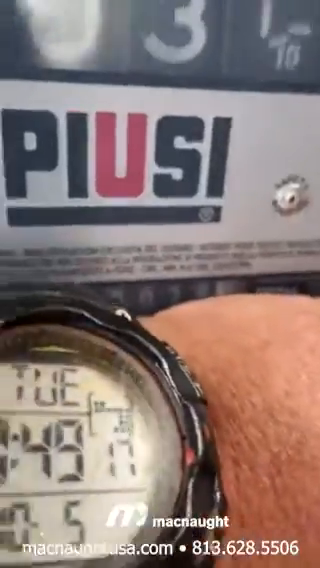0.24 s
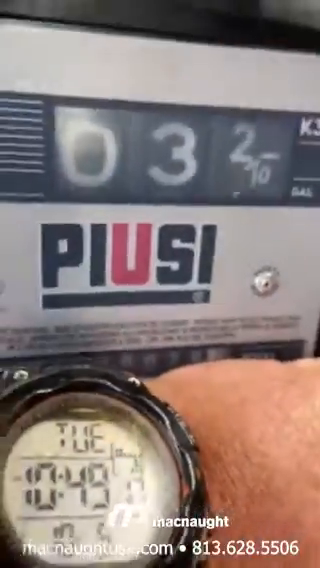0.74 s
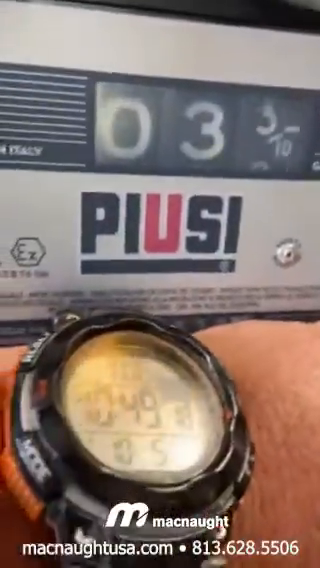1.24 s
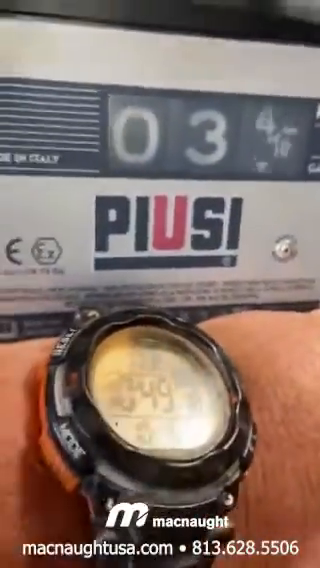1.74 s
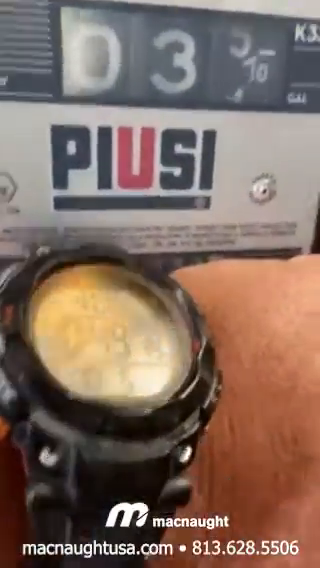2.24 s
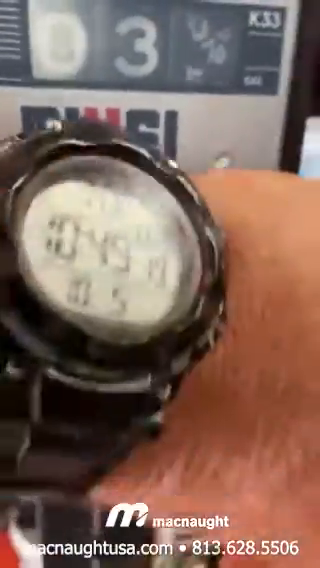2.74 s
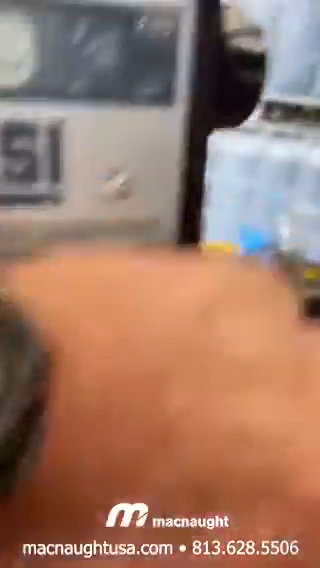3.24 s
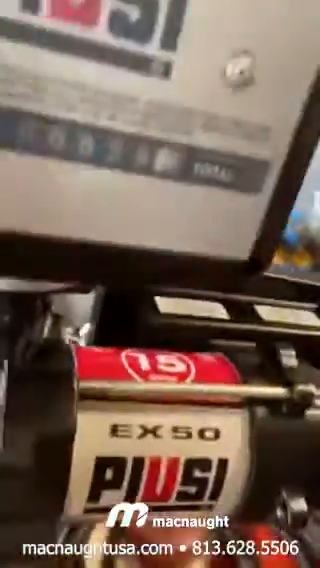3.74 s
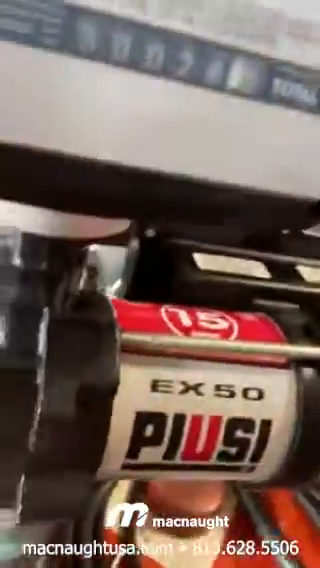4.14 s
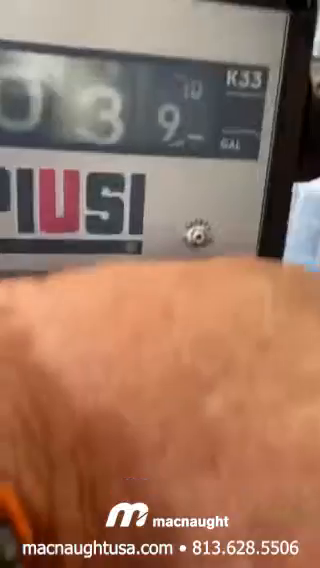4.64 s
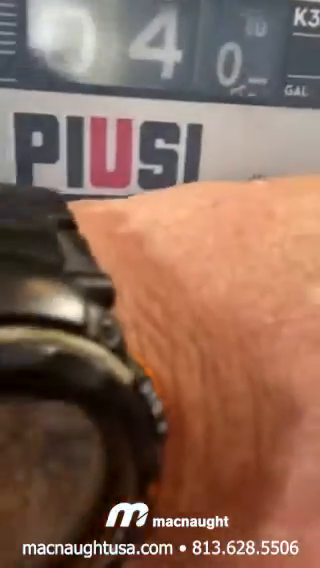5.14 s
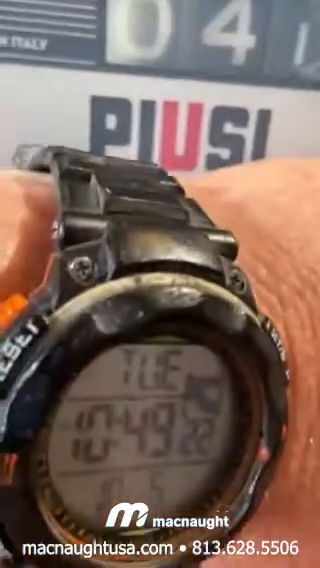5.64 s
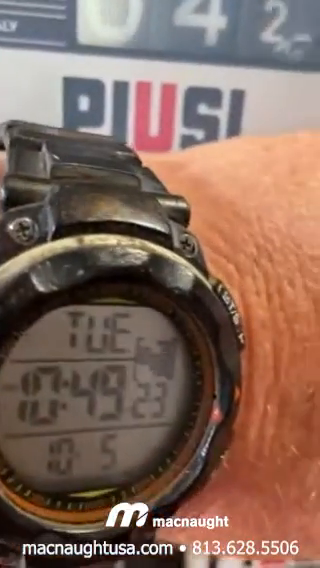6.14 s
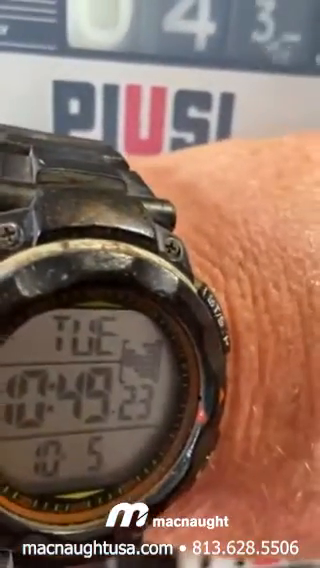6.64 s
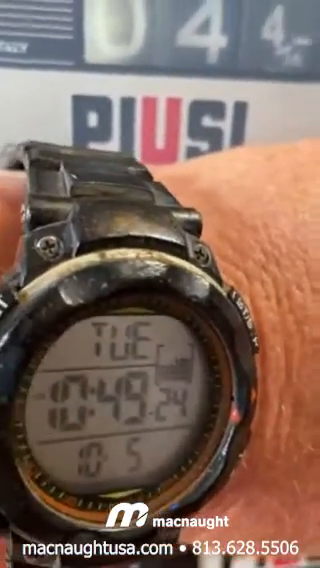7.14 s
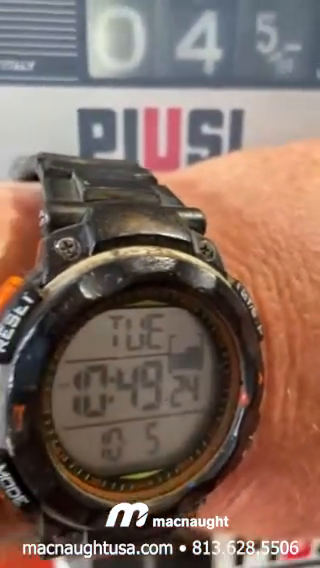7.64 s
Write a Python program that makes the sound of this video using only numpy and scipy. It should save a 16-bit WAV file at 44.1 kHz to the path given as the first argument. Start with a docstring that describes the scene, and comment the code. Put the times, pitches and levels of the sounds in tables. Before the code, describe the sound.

Steady droning buzz of a small vane pump moving fuel, slightly changing in pitch and tone, rattling and shuddering briefly midway, heard close in stereo.

```python
"""Vane pump under varying load

An electric five-vane fuel pump runs while a hand-held phone moves around its meter. Every vane
pushes out a pressure pulse: a harmonic buzz that speeds up and changes colour when the load lets up.
Under strain the casing sings. Unequal vanes rattle it once a turn, and an off-centre rotor shudders.
Fuel turbulence rushes and hisses, the meter's face echoes the treble, and two machines drone nearby."""
import sys
import numpy as np
from scipy import signal
from scipy.fft import rfft, irfft, next_fast_len
from scipy.io import wavfile
from scipy.ndimage import uniform_filter1d, map_coordinates

SR = 44100
rng = np.random.default_rng(int(sys.argv[2]) if len(sys.argv) > 2 else 0)


def transcribe(signal):
    """Save signal, clipped to [-1, 1], as a 16-bit WAV file at the path in sys.argv[1]."""
    frames = np.atleast_2d(signal).T
    limited = np.clip(frames, -1, 1)
    pcm = np.round(limited * 32767).astype(np.int16)
    wavfile.write(sys.argv[1], SR, pcm)


N = 347508

# Strains, when the pump labours and its casing sings. Each row: start in seconds, length in seconds,
# depth, initial pitch of the singing in Hz, its full level in dB.
STRAINS = [(0.163, 0.47, 0.56, 3300, -49), (2.17, 0.34, 0.18, 3650, -38), (3.101, 0.28, 0.46, 3260, -40),
           (4.58, 0.171, 0.32, 2560, -48), (5.303, 0.22, 0.27, 3150, -45)]
# Shudders of the casing. Each row: start in seconds, length in seconds, strength.
SHUDDERS = [(3.42, 0.45, 0.22), (3.87, 0.43, .9), (4.32, 0.55, 0.45)]

VANES = 5
LOAD_ATTACK_S, LOAD_RELEASE_S = 0.101, 0.2
FADE_S = 0.057  # rise and fall of the brief changes of partials, and of shudders and throbs
UNLOADED_DEPTH = 0.59  # depth of easing beyond which the vanes lose their bite
SWING_ANGLE = 3.0  # angle of the turn, in radians, where the rotor is closest to the housing


def buzz(phase, ease, shares):
    """Harmonic series of a periodic source: the load shifts strength between partials of the vane pulses."""
    # Low hum, the second partial. Each row: time in seconds, level in dB.
    hum_table = [(0.0, -21), (0.22, -20.5), (0.5, -25.5), (2.04, -22.5), (2.57, -29.5), (2.61, -25),
                 (3.93, -24), (4.08, -21.5), (4.32, -25.5), (4.54, -21), (4.78, -28), (4.96, -22.5),
                 (5.64, -26), (6.43, -21.5), (7.81, -27.5), (7.88, -26)]
    # Other partials. Each row: multiple of the vane rate, level in dB at place 0, 1 and 2
    # (before a common trim), change in dB at an easing of depth 1.
    partials = [(1, -35.5, -34, -32.5, 0.5), (3, -44, -39.5, -42, -0.5), (4, -25.5, -27, -35.5, 1),
                (5, -38, -42.5, -38, 7.5), (6, -27.5, -28.5, -32.5, -2), (7, -27.5, -31.5, -24.5, 5.5),
                (8, -49, -39, -36.5, 1), (9, -33.5, -43.5, -45, -0.5), (10, -44, -37, -43, -1),
                (11, -29, -28.5, -39, -3), (12, -30, -36, -46, -2), (13, -35, -53, -44, -5),
                (14, -38.5, -40.5, -46, -2), (15, -40.5, -46, -48.5, 0.5), (16, -38, -44.5, -43.5, -2),
                (17, -45.5, -63, -58, -10), (18, -47, -40, -43, -3), (19, -47.5, -49, -40.5, -11),
                (20, -49, -47.5, -54, -12), (21, -51, -58, -55, -10), (22, -48.5, -57, -57, -1.5),
                (23, -69, -65, -47, 5), (24, -63, -58, -46, -2), (25, -54, -54, -66, -1),
                (27, -52, -50, -66, -0.5), (29, -64, -63, -64, 1), (32, -69, -68, -52, 1),
                (34, -68, -59, -65, -2)]
    # Single partials swell or sink for a while.
    # Each row: start in seconds, length in seconds, change in dB, multiple of the vane rate.
    single_changes = [(2.245, 0.5, 17, 3), (3.213, 1.67, 14.5, 3), (2.603, 0.26, -6.5, 4),
                      (3.55, 0.73, 3.5, 4), (5.1, 0.077, -9, 4), (5.88, 0.34, -6, 4), (7.3, 0.66, 5, 4),
                      (1.6, .6, 1, 5), (2.6, 0.21, -3, 5), (4.2, .63, -7, 5), (4.35, .15, 1.5, 5),
                      (4.92, 0.533, 2.5, 5), (5.99, .2, 4, 5), (6.278, 0.301, -12, 5), (6.8, 1.1, 5, 5),
                      (5.57, .13, -5, 6), (5.98, .15, 1, 6), (7.15, 0.69, 3.5, 6), (0.253, 0.26, -7, 7),
                      (2.299, 0.22, -7, 7), (3.141, 0.41, -5.5, 7), (3.797, 0.428, 3.5, 7),
                      (4.5, 0.21, 4, 7), (4.87, 0.33, 4.5, 7), (6.3, 1.55, 2, 7), (2.8, .3, 5, 8),
                      (4.35, 0.25, 5.5, 8), (6.4, 1.25, 2, 8), (5.989, 1.29, 10, 9), (4.55, 0.94, 3.5, 10),
                      (5.999, 1.13, 4.5, 10), (3.617, 0.222, 2, 11), (3.84, 0.16, -3, 11),
                      (3.8, 0.14, 3.5, 11), (4.55, 0.346, -0.5, 11), (0.347, 0.44, 3, 12),
                      (3.18, .28, 2.5, 12), (3.83, 0.34, -14, 12), (4.9, 0.67, 3.5, 12), (2.05, .5, -6, 13),
                      (5.17, 0.42, 8, 13), (4.97, 0.69, -17, 14), (3.52, 0.58, -6, 16),
                      (0.18, 0.497, 1.5, 20), (.2, .5, 0.5, 17), (1, .8, 0, 17), (7.1, .8, 5, 23),
                      (4.75, 0.62, 10.5, 25)]
    # Dips of the partials above the second. Each row: start in seconds, length in seconds, change in dB.
    muffles = [(5.517, 0.468, -2.5)]
    # Throb depth added by a shudder of strength 1. Each row: multiple of the vane rate, depth from 0 to 1.
    shudder_depths = [(3, .05), (4, .38), (6, .36), (7, .08), (9, .15), (10, .3), (11, .42), (14, .35),
                      (20, .3)]
    collapse = 6.7  # further loss without load, for partials that need it
    wander_db, upper_wander_db, flutter_db = 0.84, 1.5, 1.02
    phase_spread = 1.27  # radians, from each partial's own path through the casing
    port_spread = 0.02  # difference between the ports per multiple of the vane rate
    whine_db, limp_db = -0.12, -23

    hum_db, = curves(hum_table)
    muffle_db = swells(muffles, FADE_S, FADE_S)
    shaking = swells(SHUDDERS, FADE_S, FADE_S)
    unloaded = np.maximum(ease - UNLOADED_DEPTH, 0)
    rotor = np.exp(1j * (phase / VANES - SWING_ANGLE))

    def partial(order, db):
        """A partial as a rotating phasor, with a fluttering level and a phase of its own."""
        angle = order * phase + phase_spread * rng.standard_normal()
        return undb(db + flutter_db * walk(35)) * np.exp(1j * angle)

    whine, apart = 0, 0
    for order, *place_db, ease_db in partials:
        order = round(order)
        # short waves wander most as the phone moves
        wander = np.interp(order, (7, 13), (wander_db, upper_wander_db)) * walk(4)
        load_db = ease_db * ease + collapse * min(ease_db, 0) * unloaded
        own_changes = [row for row in single_changes if round(row[-1]) == order]
        change_db = swells(own_changes, FADE_S, FADE_S)
        total_db = np.array(place_db) @ shares + load_db + change_db + wander
        if order > 1:
            total_db = total_db + muffle_db
        # the off-centre rotor makes the partials surge together once a turn, deeply in a shudder
        limp = undb(limp_db) + shaking * np.interp(order, *np.transpose(shudder_depths))
        tone = partial(order, total_db) / (1 - limp * rotor)
        whine = whine + tone.real
        apart = apart + port_spread * order * walk(1.99) * tone.imag
    hum = partial(2, hum_db).real
    stereo_whine = whine + np.array([[1], [-1]]) * apart
    return np.sqrt(2) * (hum + undb(whine_db) * stereo_whine)


def rattle(phase, shares):
    """Impulse excitation of resonances: unequal vanes knock the casing in a pattern repeated each turn."""
    # Casing resonances. Each row: centre in Hz, width in Hz, relative level in dB at place 0, 1 and 2.
    casing_modes = [(407, 59, 11, 11, -1), (760, 190, 0.5, 6, -22), (1210, 93, 6, 5.5, 7.5),
                    (1477, 170, 4, -25, -6), (1715, 270, -33, -5.5, -1), (2720, 2300, -24, -27, -18),
                    (3730, 1350, -8.5, -30, -7)]
    rattle_db, second, scatter = -35.5, 0.56, 0.41

    stroke = phase / (2 * np.pi)
    number = np.arange(1, int(stroke[-1]))
    angle = 2 * np.pi * number / VANES
    chance = rng.standard_normal(len(number))
    size = np.cos(angle) + second * np.cos(2 * angle + 1) + scatter * chance
    # each knock is shared between the two samples around its exact instant
    at = np.interp(number, stroke, np.arange(N))
    whole, part = at.astype(int), at % 1
    knocks = np.bincount(whole, size * (1 - part), N + 1)
    knocks = knocks + np.bincount(whole + 1, size * part, N + 1)
    casing = sum(undb(place_db)[:, None] * resonance(hz, width) for hz, width, *place_db in casing_modes)
    return level(np.sum(shares * shape(knocks[:N], casing), axis=0), rattle_db)


def fuel(phase, ease, shares):
    """Modulated turbulence: smooth in the bass, higher up a spurt per vane that partly repeats each turn."""
    # Spectrum of the rush. Each row: frequency in Hz, relative density in dB per Hz at place 0, 1 and 2.
    flow = [(20, -80, -80, -80), (35, -61, -63, -67), (60, -58.5, -57.5, -56.5), (382, -58, -57.5, -57.5),
            (577, -62, -64, -60.5), (694, -57, -56.5, -61), (945, -68.5, -64, -68.5),
            (1250, -60.5, -61, -57.5), (1650, -68, -62.5, -66.5), (2000, -58.5, -61.5, -62),
            (2560, -64, -66.5, -65), (3150, -65, -64.5, -62), (3650, -68, -64, -68.5),
            (3900, -69.5, -64.5, -64.5), (4230, -66, -65, -62.5), (4470, -70.5, -69.5, -75.5),
            (6020, -73, -69, -69), (7000, -89, -85.5, -84.5), (11100, -74, -70.5, -71),
            (11650, -70.5, -61.5, -64), (12100, -67, -63, -63), (13060, -64.5, -61.5, -59),
            (16400, -94, -92, -88)]
    # Part that repeats with the shaft. Each row: frequency in Hz, share of the power from 0 to 1.
    repeating_share = [(300, .15), (600, .25), (1100, .75), (2000, .8), (2600, .85), (4200, .85),
                       (6500, .6), (12000, .15)]
    # Hiss of the fuel in the valve. Each row: time in seconds, level in dB before trim and load.
    valve_hiss = [(0, -33.5), (3.2, -34), (3.65, -31.5), (4.2, -30.5), (4.6, -35.5), (5.7, -33.5),
                  (6.7, -33.5), (7.88, -33.5)]
    apart_db = -6  # noise that differs between the ports
    rush_db, hiss_db = -2.0, 1.1  # trims
    ease_hiss_db = -1.5  # change at an easing of depth 1
    pulsing, flicker_db, split_hz = 0.23, 0.78, 2300.0

    apart = shape(rng.standard_normal((2, N)), np.minimum(bins() / 3500, 1))
    repeating = contour(repeating_share)
    churn = shape(per_turn(phase), np.sqrt(repeating))
    churn = churn + shape(rng.standard_normal(N), np.sqrt(1 - repeating))
    noise = np.sqrt(SR / 2) * (churn + undb(apart_db) * apart)
    spurts = (1 + pulsing * np.cos(phase - 1)) * undb(flicker_db * walk(40))
    bass = 1 / (1 + (bins() / 800) ** 4)
    noise = shape(noise, bass) + shape(noise * level(spurts, 0), 1 - bass)
    rush = sum(share * shape(noise, undb(contour(flow, axis=k + 1))) for k, share in enumerate(shares))
    low = shape(rush, 1 / (1 + (bins() / split_hz) ** 4))
    # the treble is the valve's hiss: even out its power over half a second, then give it its own level
    hiss = patchy(rush - low)
    hiss = hiss / np.sqrt(uniform_filter1d(np.mean(hiss ** 2, axis=0), SR // 2))
    valve_db, = curves(valve_hiss)
    return undb(rush_db) * low + undb(valve_db + hiss_db + ease_hiss_db * ease) * hiss


def per_turn(phase):
    """Correlated noise: a pattern returns with every turn of the shaft, a little changed each time."""
    turns = phase / (2 * np.pi * VANES) + 1
    size = round(N / (turns[-1] - turns[0]))
    memory = 0.88  # correlation between successive turns
    fresh = rng.standard_normal((int(turns[-1]) + 2, size))
    gain = np.sqrt(1 - memory ** 2)
    pattern, _ = signal.lfilter([gain], [1, -memory], fresh, axis=0, zi=memory * fresh[-1:])
    return map_coordinates(pattern.ravel(), [turns * size], mode="mirror")


def patchy(x):
    """Independent band modulation: neighbouring bands of hiss swell and fade as the phone moves."""
    from_hz, width_hz, count = 2510, 373.0, 8
    depth_db, rate_hz = 1.5, 2.52
    out = x
    for k in range(count):
        band = np.maximum(1 - np.abs(bins() - from_hz - k * width_hz) / width_hz, 0)
        out = out + (undb(depth_db * walk(rate_hz)) - 1) * shape(x, band)
    return out


def singing(phase):
    """Driven resonance: under strain each vane scrapes the housing and rings a mode that slides upward."""
    rise_hz_per_s, width_hz, rough = 400, 300, 0.3
    sharpness, uneven = 170.0, 0.15
    t = np.arange(N) / SR
    scrapes = np.exp(sharpness * (np.cos(phase) - 1))
    scrapes = scrapes * (1 + uneven * np.cos(phase / VANES) + rough * walk(340))
    ring = 1 / (1 + (bins() / width_hz) ** 2)
    out = 0
    for s, length, _, hz, db in STRAINS:
        centre_hz = hz + rise_hz_per_s * np.clip(t - s, 0, length)
        centre = np.exp(2j * np.pi * np.cumsum(centre_hz) / SR)
        # shift the mode down to zero, filter there, and shift back up
        tone = sum(part * shape(scrapes * part, ring) for part in (centre.real, centre.imag))
        out = out + level(tone, db) * swells([(s, length, 1)], LOAD_ATTACK_S, LOAD_RELEASE_S)
    return out


def shudder(phase):
    """Friction excites casing modes: the rotor swings at the housing and scrapes a rough burst each turn."""
    # Modes of the shudder. Each row: centre in Hz, width in Hz, level in dB at strength 1.
    modes = [(750, 110, -34), (1889, 204, -37), (3358, 1190, -42)]
    sharpness = 2.2
    scrapes = np.exp(sharpness * (np.cos(phase / VANES - SWING_ANGLE) - 1)) * per_turn(phase)
    ringing = sum(level(shape(scrapes, resonance(hz, width)), db) for hz, width, db in modes)
    return swells(SHUDDERS, FADE_S, FADE_S) * ringing


def sidebands(phase, shares):
    """Modulation sidebands: the uneven rotor adds tones between vane partials; they beat with neighbours."""
    # Lasting tones. Each row: multiple of the shaft rate, mean level in dB at place 0, 1 and 2.
    lasting = [(21, -42, -33, -50), (23, -57, -41, -76), (24, -43.5, -47, -39), (26, -48, -66, -49),
               (31, -47, -48, -43.5), (32, -74, -48.5, -60), (34, -48, -57, -47), (37, -61, -55, -52),
               (56, -50, -57, -55), (59, -43, -52, -63)]
    # Swelling tones. Each row: start in seconds, length in seconds, level in dB, multiple of the shaft rate.
    throbs = [(3.87, 0.42, -44, 66), (5.25, 0.71, -34, 36), (5.57, .45, -40, 37), (5.4, 0.455, -40, 39),
              (2.65, 0.52, -43, 24)]
    wander_db = 3.0

    def tone(order):
        """A steady sinusoid locked to the shaft."""
        return np.sqrt(2) * np.cos(round(order) * phase / VANES + 2 * np.pi * rng.random())

    out = 0
    for order, *place_db in lasting:
        out = out + undb(np.array(place_db) @ shares + wander_db * walk(5.5)) * tone(order)
    for s, length, db, order in throbs:
        out = out + swells([(s, length, undb(db))], FADE_S, FADE_S) * tone(order)
    return out


def chatter(ease):
    """Resonant noise: without load the vanes flutter loosely in their slots and rasp."""
    # The row: centre in Hz, width in Hz, level in dB before scaling by the excess of easing.
    hz, width, db = (2060, 210, -39)
    rasp = shape(rng.standard_normal(N), resonance(hz, width))
    return np.clip(ease - UNLOADED_DEPTH, 0, 1) * level(rasp, db)


def echo(x):
    """Comb filtering: the meter's face reflects the lower treble over a path that changes with the phone."""
    delay_s, drift_s, echo_db = 0.001, 0.00012, -9.5
    from_hz, to_hz = 2800, 7000
    ports = 0.012  # size of each port's own drift beside the common one
    treble = shape(x, 1 / (1 + (from_hz / bins()) ** 4) / (1 + (bins() / to_hz) ** 4))
    sway = walk(2.2)
    reflected = []
    for side in treble:
        lag = (delay_s + drift_s * (sway + ports * walk(3.9))) * SR
        reflected.append(map_coordinates(side, [np.arange(N) - lag], mode="mirror"))
    return x + undb(echo_db) * np.array(reflected)


def drone():
    """Beating: two machines hum at slightly different speeds."""
    # Rotation of the two machines, in turns a second.
    machine_hz = (52.85, 57.2)
    # Each row is one machine: level in dB of multiples 1 to 5 of its rotation.
    machine_levels = [(-42, -56, -34, -54, -40), (-32.5, -45.5, -44.5, -48, -47.5)]
    wobble = 0.28  # radians
    out = np.zeros(N)
    for hz, levels in zip(machine_hz, machine_levels):
        phase = 2 * np.pi * hz * np.arange(N) / SR + wobble * walk(4.9)
        for k, db in enumerate(levels):
            out += undb(db) * np.cos((k + 1) * phase + 2 * np.pi * rng.random())
    return np.sqrt(2) * out


def undb(db):
    """Decibel law: amplitude ratio of a level."""
    return 10 ** (np.asarray(db) / 20)


def level(x, db):
    """Root-mean-square normalisation to a level in dB."""
    return x * undb(db) / np.sqrt(np.mean(x ** 2))


def curves(table):
    """Linear interpolation in time of each column after the first."""
    s, *columns = np.transpose(table)
    return [np.interp(np.arange(N) / SR, s, c) for c in columns]


def swells(rows, attack_s, release_s):
    """Linear envelopes, summed: each rises from its start and dies away once its length has passed."""
    t = np.arange(N) / SR
    total = 0
    for s, length, size, *_ in rows:
        rise = np.clip((t - s) / attack_s, 0, 1)
        fall = np.clip(1 - (t - s - length) / release_s, 0, 1)
        total = total + size * rise * fall
    return total


def walk(rate):
    """Slow chance by interpolation: random knots at a rate in Hz, joined by lines, with a spread near 1."""
    knots = 1.2 * rng.standard_normal(4096)
    return np.interp(np.arange(N) * rate / SR, np.arange(len(knots)), knots)


def bins():
    """Discrete spectrum: frequencies in Hz of the long transform used by the spectral filters."""
    return np.maximum(np.fft.rfftfreq(next_fast_len(N, True), 1 / SR), 1)


def contour(table, axis=1):
    """Spectral envelope: one column interpolated over log frequency."""
    table = np.array(table, float)
    return np.interp(np.log(bins()), np.log(table[:, 0]), table[:, axis])


def shape(x, gain):
    """Linear filtering: multiply the spectrum by a complex gain per frequency."""
    size = next_fast_len(N, True)
    return irfft(rfft(x, size) * gain, size)[..., :N]


def resonance(hz, width):
    """Two identical damped resonators in cascade, as a gain per frequency."""
    return 1 / (1 + 1j * (bins() / hz - hz / bins()) * hz / width) ** 2


def scene():
    """Common drive: one shaft times the pump's sounds; load and the phone's place set their colour."""
    # Slow drift of speed. Each row: time in seconds, vane rate in Hz before load and hunting.
    speed = [(0, 171), (.6, 171.1), (1.95, 170.9), (2.3, 171.1), (2.55, 170.5), (2.75, 170.9), (3.3, 170.8),
             (3.5, 171.3), (3.78, 170.8), (3.95, 172.1), (4.15, 172), (4.28, 171.2), (4.8, 170.8),
             (5.25, 170.8), (5.38, 172), (5.52, 171), (5.9, 172.4), (6.1, 171.6), (6.4, 172.2),
             (7.2, 171.2), (7.88, 170.8)]
    # Easings, when the load lets up. Each row: start in seconds, length in seconds, depth.
    easings = [(-.11, 0.15, 0.99), (.75, 0.17, 0.9), (1.34, 0.16, 0.22), (1.76, 0.16, 0.75),
               (2.58, .3, 1.5), (4.27, .17, 1.32), (4.85, 0.2, 0.52), (5.57, 0.1103, 0.27),
               (6.0, 0.15, 0.67), (6.9, 0.88, 0.3), (7.27, 0.6, 0.39)]
    # The phone's path. Each row: time in seconds, place (0 facing the meter, 1 beside the motor,
    # 2 low behind the arm; fractions lie between).
    path = [(0, 0.019), (2.5, 0.05), (2.75, 0.98), (3.2, 0.43), (3.8, 1.03), (4.3, 0.94), (4.8, 0.62),
            (5.4, 1.54), (6.1, 1.67)]
    ease_hz = 1.15  # gain in vane rate at an easing of depth 1
    hunting_hz = 0.119  # random spread of the vane rate
    jitter = 0.007  # unevenness of turning, in radians of the vane cycle

    ease = swells(easings, LOAD_ATTACK_S, LOAD_RELEASE_S)
    ease = ease - swells(STRAINS, LOAD_ATTACK_S, LOAD_RELEASE_S)
    vane_hz = curves(speed)[0] + ease_hz * ease + hunting_hz * walk(6)
    phase = 2 * np.pi * np.cumsum(vane_hz) / SR + jitter * walk(60)
    place, = curves(path)
    # weight of each place, crossfaded linearly
    shares = np.maximum(1 - np.abs(np.clip(place, 0, 2) - np.arange(3)[:, None]), 0)
    tones = buzz(phase, ease, shares) + sidebands(phase, shares)
    scraping = singing(phase) + shudder(phase) + chatter(ease)
    reflected = echo(rattle(phase, shares) + fuel(phase, ease, shares))
    return tones + scraping + reflected + drone()


def record(dry):
    """Two-port reception: lag and balance vary with frequency; then overall treble gain and a steep top cut."""
    # Lag of the right port behind the left. Each row: frequency in Hz, phase in radians.
    port_lag = [(0, 0), (860, 0.5), (1550, -0.2), (2670, 0.8), (4480, 0.6), (5510, 0.2), (6630, 3.2),
                (8180, 3.2), (9730, 6.4), (10900, 6.3), (13200, 9.5), (14900, 9.5), (15200, 12.4),
                (16600, 12.6)]
    # Balance of the ports. Each row: frequency in Hz, left minus right in dB.
    port_balance = [(65, 0), (170, -2), (340, -2.3), (700, -.3), (1100, .4), (2000, -.5), (4000, -1),
                    (7000, 0)]
    # Overall treble gain, with a deep dip near 14 kHz. Each row: frequency in Hz, gain in dB.
    treble_gain = [(6000, -0.5), (9800, -0.5), (12900, -8), (14000, -24), (15800, 2)]
    top_hz = 15850
    sides = np.array([[0.5], [-0.5]])
    lag = np.interp(bins(), *np.transpose(port_lag))
    gain = undb(contour(treble_gain) + sides * contour(port_balance))
    response = gain * np.exp(1j * sides * lag)
    top_cut = signal.ellip(10, 0.2, 80, top_hz, fs=SR, output="sos")
    return signal.sosfilt(top_cut, shape(dry, response))


dry = scene()
out = record(dry)
transcribe(out)
```